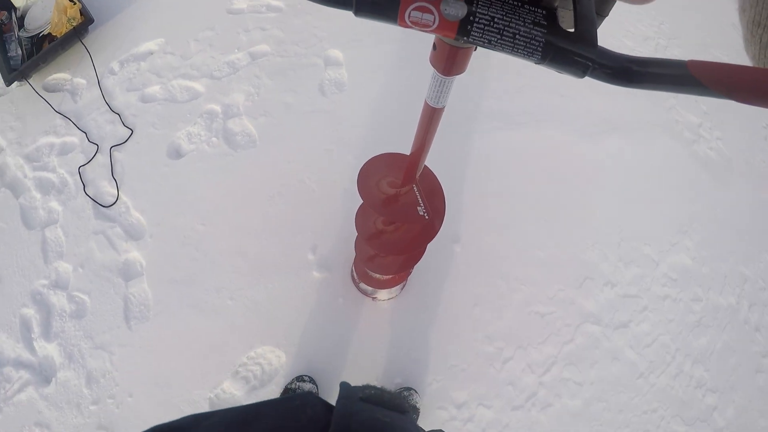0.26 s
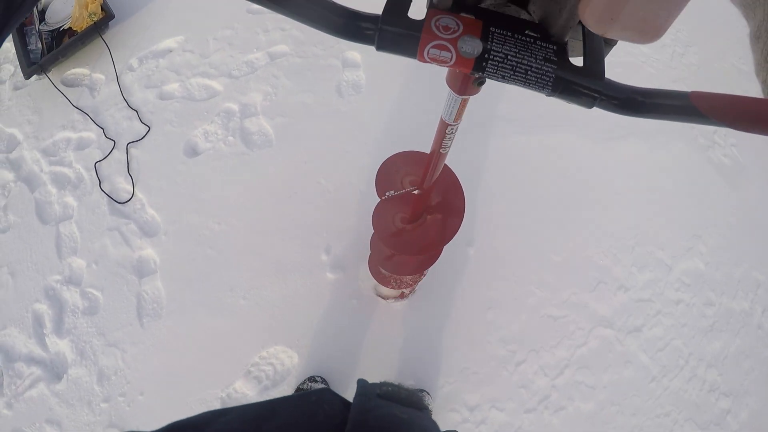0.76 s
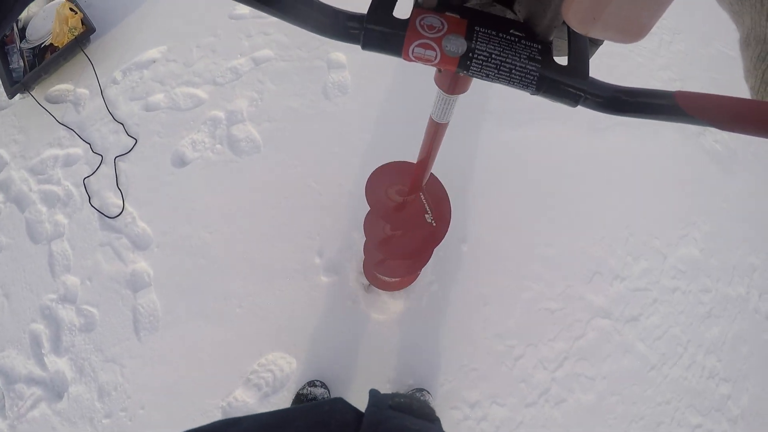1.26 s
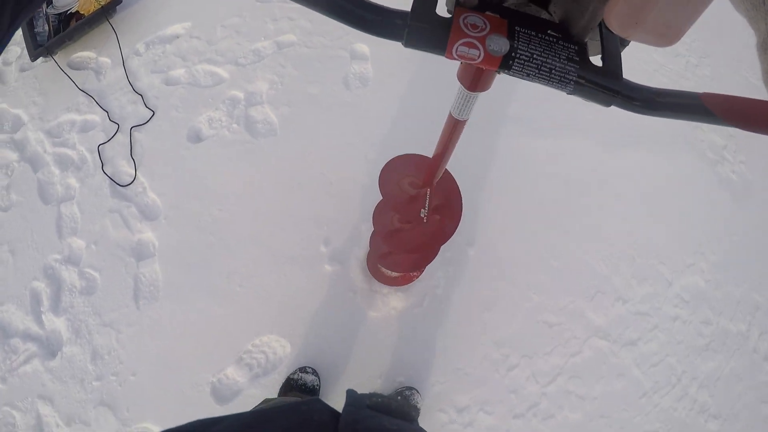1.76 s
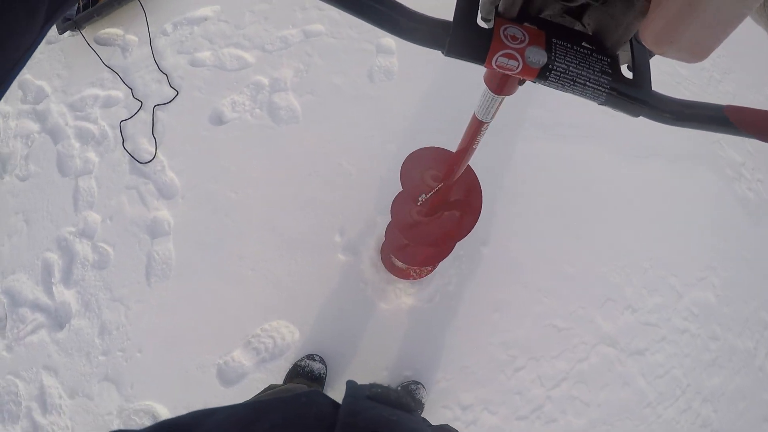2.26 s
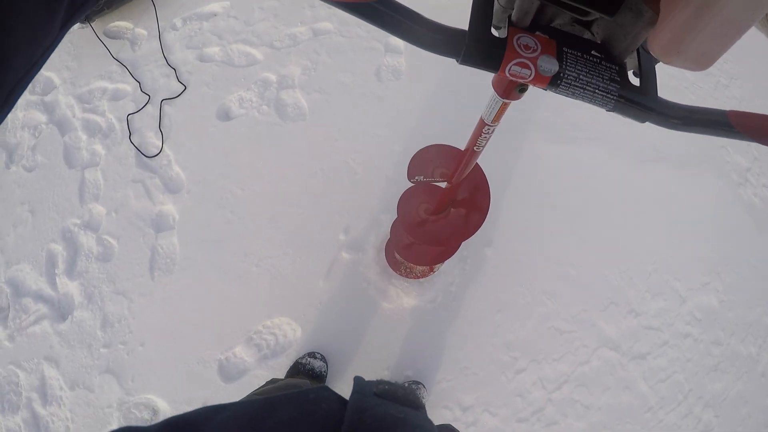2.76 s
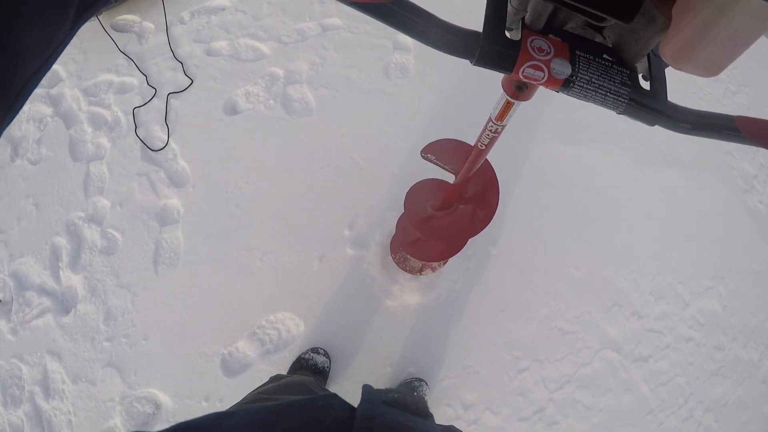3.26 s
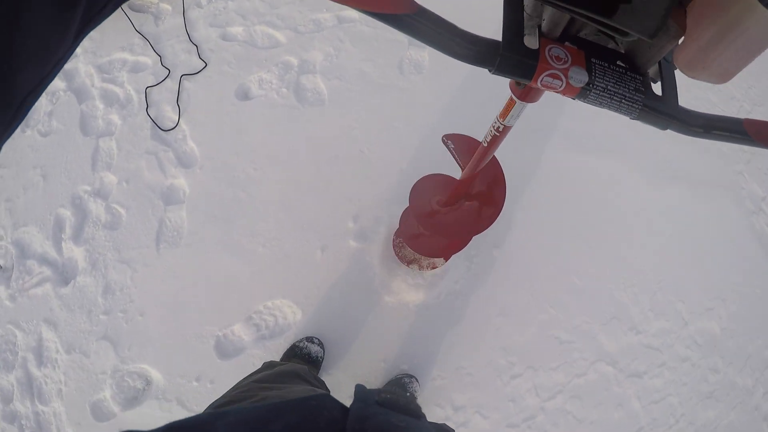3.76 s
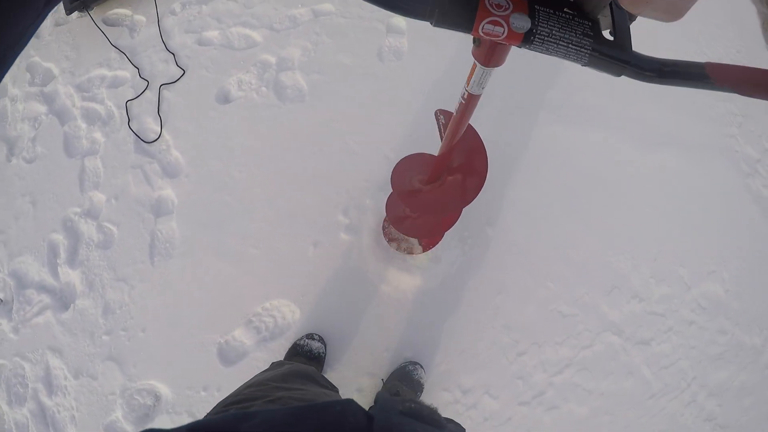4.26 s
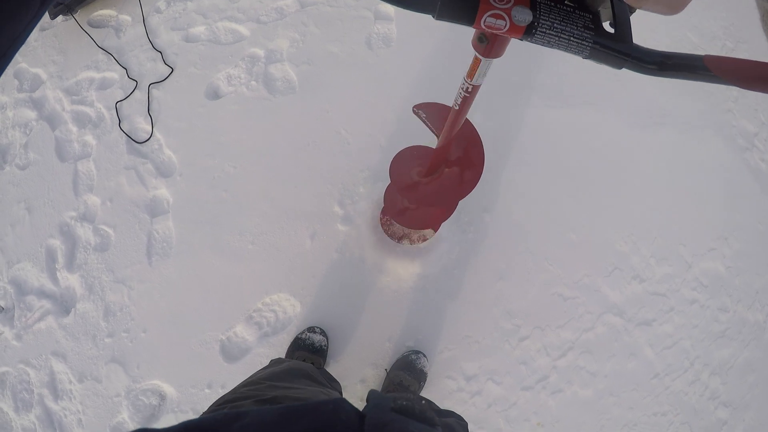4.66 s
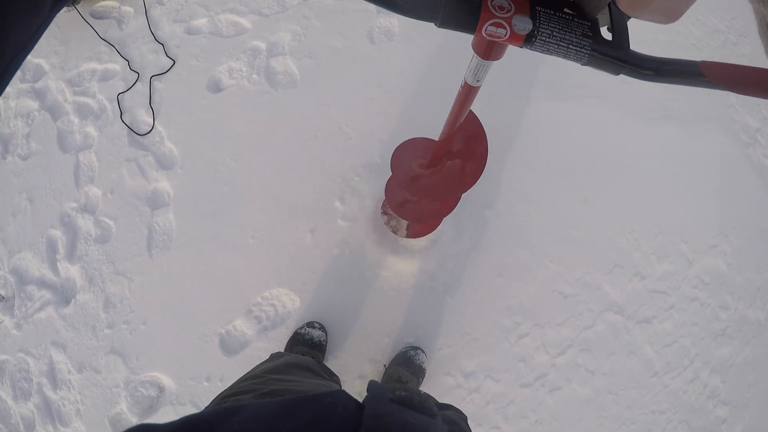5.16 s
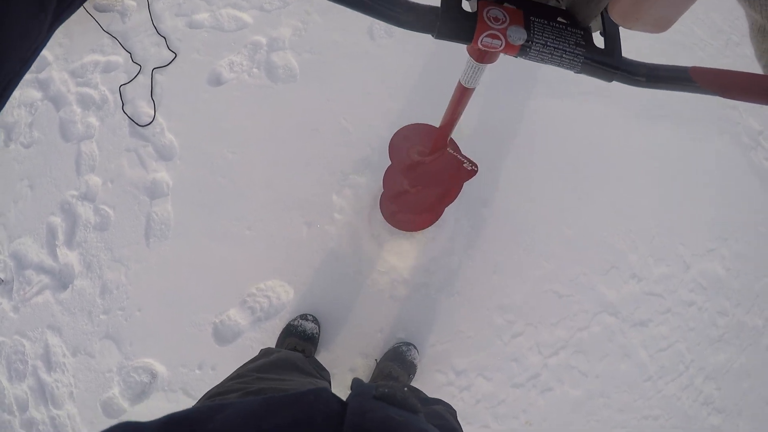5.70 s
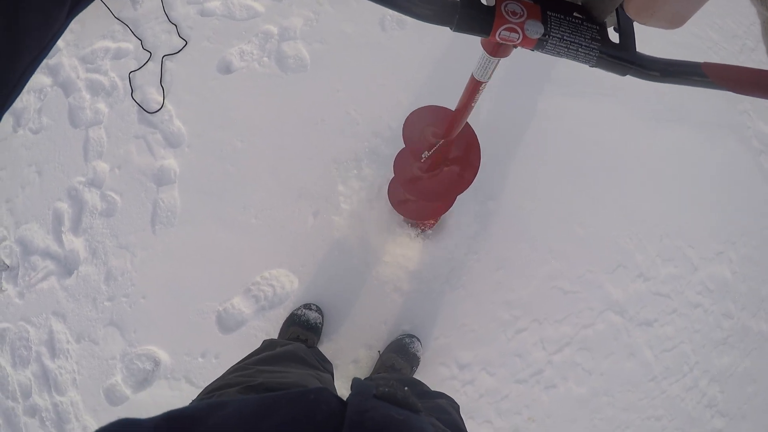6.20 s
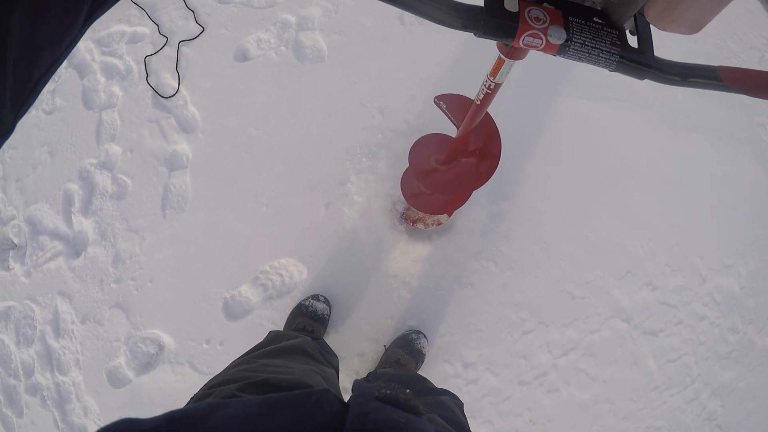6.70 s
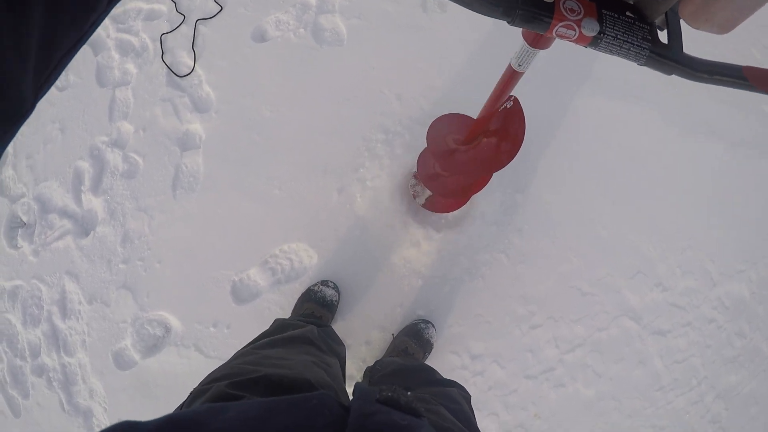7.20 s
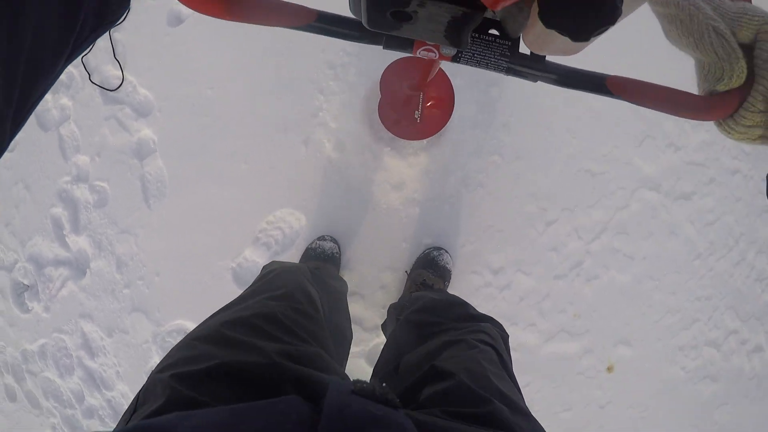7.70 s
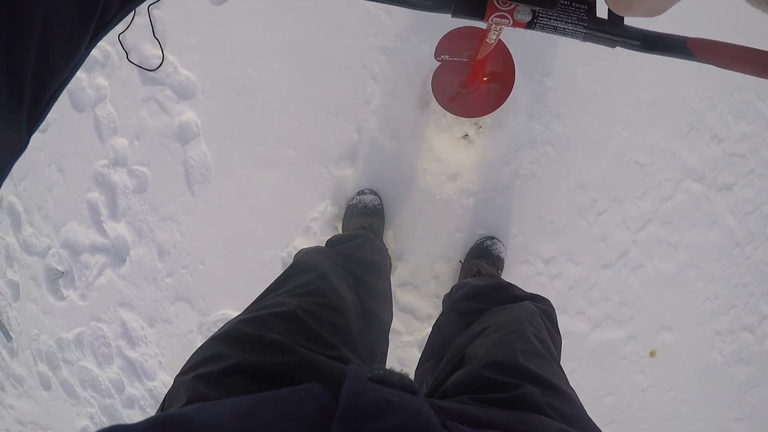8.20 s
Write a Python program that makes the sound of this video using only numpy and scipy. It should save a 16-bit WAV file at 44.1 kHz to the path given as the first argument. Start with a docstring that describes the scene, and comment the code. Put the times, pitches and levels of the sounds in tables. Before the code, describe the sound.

A motorised ice auger heard very close outdoors, with no echo. The two-stroke engine lugs in a low rough drone while blades scrape the ice with growing hiss. The scrape fades as they sink, the engine climbs and its gears sing. Near the end it races with a whistle, then slows and sputters unevenly. Body-worn microphone, opening up from mono to stereo.

```python
"""A two-stroke ice auger bores through lake ice, heard close up by a body-worn camera's microphones.
At first the engine labours, a deep exhaust thud under overtones, while the blades scrape the surface.
As they sink the scrape fades, the engine speeds up and its loaded gearbox sings; one microphone gives way to two.
Near the end the auger is lifted and the engine races, its flywheel vanes whistling. Then the throttle
closes: it slows and sputters, strong and weak firings mostly alternating, and its exhaust note dies away."""
import sys
import numpy as np
from scipy import signal
from scipy.fft import rfft, irfft, next_fast_len
from scipy.io import wavfile

SR = 44100
rng = np.random.default_rng(int(sys.argv[2]) if len(sys.argv) > 2 else 0)


def inscribe(sig):
    """Save sig as 16-bit PCM at rate SR to the path in sys.argv[1].

    A 1-D sig is mono; a 2-D sig holds one channel per row.
    Samples are clipped to [-1, 1] before scaling.
    """
    pcm = np.round(np.clip(np.atleast_2d(sig).T, -1, 1) * 32767)
    wavfile.write(sys.argv[1], SR, pcm.astype(np.int16))


N = 372644
TIME = np.arange(N) / SR

# the steps of the job: (start [s], length [s])
CATCH = (0.33, 0.12)  # the engine clears and fires more evenly
SINK = (1.57, 0.38)  # the blades sink below the surface
LIFT = (7.25, 0.025)  # the blades leave the ice
RELEASE = (7.48, 0.21)  # the throttle closes
COAST = (8.35, 0.09)  # the thud dies away


def amp(db):
    """Decibels to gain."""
    return 10 ** (np.asarray(db) / 20)


def unit(x):
    """Scales to rms 1."""
    return x / np.sqrt(np.mean(x ** 2) + 1e-20)


def blend(a, b, share):
    """From a at share 0 to b at share 1."""
    return a + (b - a) * share


def done(step):
    """How far a step of the job has gone: 0 before it, 1 after it."""
    start, length = step
    return np.clip((TIME - start) / length, 0, 1)


def curve(rows, column=1):
    """One column of a time table at every sample."""
    table = np.array(rows, float)
    return np.interp(TIME, table[:, 0], table[:, column])


def colour(rows, hz, column=1):
    """One column of a frequency (or engine order) table, read on a log axis."""
    table = np.array(rows, float)
    return np.interp(np.log(hz + 1), np.log(table[:, 0] + 1), table[:, column])


def drift(hz):
    """Random wander of rms 1 that takes hz new values a second."""
    knots = rng.standard_normal(4096)
    return unit(np.interp(TIME * hz, np.arange(len(knots)), knots))


def hiss(spectrum):
    """Coloured noise at two microphones, partly alike by frequency; their mean has rms 1."""
    # how alike the two microphones hear hiss: (frequency [Hz], coherence [0 to 1])
    likeness = [(100, 1), (600, 0.9), (1100, 1), (2500, 0.25), (4400, 0.99), (5500, 0.53), (7000, 0.64),
                (9000, 0.38), (14000, 0.38)]
    size = next_fast_len(N)
    hz = np.fft.rfftfreq(size, 1 / SR)
    shared, apart = rfft(rng.standard_normal((2, size))) * amp(colour(spectrum, hz))
    alike = np.clip(colour(likeness, hz), 0, 1)
    side = apart * np.sqrt((1 - alike) / (1 + alike))
    pair = irfft([shared + side, shared - side], size)[:, :N]
    return pair / pair.mean(0).std()


def ring(spectrum, size=4096):
    """Minimum-phase impulse response of energy 1, shaped by the given spectrum."""
    hz = abs(np.fft.fftfreq(size, 1 / SR))
    log_gain = np.log(amp(colour(spectrum, hz)))
    response = np.fft.ifft(np.exp(np.conj(signal.hilbert(log_gain)))).real
    return response / np.linalg.norm(response)


def load_stage(speed):
    """0 bogged, 1 lugging, 2 cutting, 3 easing: set by speed under throttle; 4 once the engine runs free."""
    # speed at which each timbre holds: bogged, lugging, cutting, easing [turns per second]
    stage_speeds = [79.8, 85.5, 100.2, 118.3]
    loaded = np.interp(speed, np.sort(stage_speeds), np.arange(len(stage_speeds)))
    return blend(loaded, len(stage_speeds), done(RELEASE))


def thud_level(boring_db=-12.0, lugging_db=2.0, settle_s=1.1, settle_length_s=1.4,
               bogged_db=-1.5, free_db=-3, coast_db=-12):
    """The fundamental (dB): strongest while the engine lugs, weaker with the throttle closed."""
    level = boring_db + lugging_db * (1 - done((settle_s, settle_length_s)))
    level = level + bogged_db * (1 - done(CATCH))
    return level + free_db * done(RELEASE) + coast_db * done(COAST)


def bark_level(surface_db=-13.5, boring_db=-15.5, bogged_db=-0.75, free_db=-3.5):
    """The overtones together (dB), lower as the blades sink and again as the throttle closes."""
    level = blend(surface_db, boring_db, done(SINK))
    return level + bogged_db * (1 - done(CATCH)) + free_db * done(RELEASE)


def exhaust(turns, speed, lead=5.66, lead_per_stage=0.68, knee_hz=125, flutter=0.0089):
    """One firing a turn gives a deep thud and overtones whose balance and phase (radians) follow the load."""
    # exhaust timbre from heaviest load to none: (engine order, relative level [dB])
    bogged = [(1, 0), (2, -3), (3, -11), (4, -18), (5, -4.5), (6, -10.5), (7, -12.5), (8, -28), (9, -19),
              (10, -18.5), (11, -30.5), (12, -26)]
    lugging = [(1, 0), (2, -18), (3, -2), (4, -9), (5, -2), (6, -11.5), (7, -16.5), (8, -18.5), (9, -16),
               (10, -17.5), (11, -26.5), (12, -23)]
    cutting = [(1, 0), (2, -9.5), (3, -3.5), (4, -11.5), (5, -5), (6, -14), (7, -22.5), (8, -26),
               (9, -23.5), (10, -25), (11, -39), (12, -30.5)]
    easing = [(1, 0), (2, -3.5), (3, -5), (4, -11), (5, -5), (6, -15.5), (7, -21.5), (8, -24), (9, -25),
              (10, -27), (11, -41.5), (12, -35)]
    free = [(1, 0), (2, -3), (3, -8), (4, -13.5), (5, -4), (6, -9), (7, -17), (8, -23.5), (9, -21),
            (10, -25), (11, -37), (12, -34)]
    stage = load_stage(speed)
    orders = np.arange(1, 13)
    timbres = np.array([colour(rows, orders) for rows in (bogged, lugging, cutting, easing, free)])
    gains = [amp(np.interp(stage, np.arange(len(timbres)), levels)) for levels in timbres.T]
    # order 2 counts towards the bark only from cutting to easing and beyond
    power = sum(g ** 2 for g in gains[2:]) + gains[1] ** 2 * np.clip(stage - 2, 0, 1)
    bark = amp(bark_level()) / np.sqrt(power)
    out = np.zeros(N)
    for k, gain in enumerate(gains, 1):
        if k == 1:
            level = amp(thud_level())
        else:
            level = bark * gain * (1 + flutter * k * drift(14))
        # the muffler turns overtones against the thud
        shift = (lead - lead_per_stage * stage) / (1 + (knee_hz / (k * speed)) ** 2)
        out += np.sqrt(2) * level * np.cos(2 * np.pi * k * turns + shift)
    return out


def combustion(bogged_db=-32, clean_db=-46, free_db=-17.5, onset_s=0.03, loaded_chance=0.52, free_chance=0.92):
    """Swing between strong and weak firings (dB) and chance of alternating; both jump as the throttle closes."""
    free = done((RELEASE[0], onset_s))
    swing_db = blend(blend(bogged_db, clean_db, done(CATCH)), free_db, free)
    return swing_db, blend(loaded_chance, free_chance, free)


def sputter(turns, speed, scatter=0.8, bounce=0.44, bounce_s=0.00199):
    """Firings stronger or weaker than the mean ring the muffler; with the throttle closed most alternate."""
    # single uneven firings, each thumping in the muffler:
    # (time [s], size of the departure from the mean firing [dB])
    uneven_firings = [(.312, -16), (7.777, -12.5), (8.297, -14.5)]
    # the ring of one firing in the muffler: (frequency [Hz], relative level [dB])
    muffler_ring = [(30, -43.5), (65, -12.5), (120, -6.5), (170, -2.5), (225, 3), (280, -2.5), (340, -8),
                    (390, -3), (470, -9), (610, -8.5), (750, -20), (1100, -28), (2000, -55.5), (5000, -82)]
    at = np.flatnonzero(np.diff(np.floor(turns)) > 0)  # the sample of each firing
    flips, sizes = rng.random(len(at)), rng.uniform(-1, 1, len(at))
    swing_db, alternate = combustion()
    swing = np.cumprod(np.where(flips < alternate[at], -1, 1)) + scatter * sizes
    kicks = np.zeros(N)
    kicks[at] = unit(swing) * amp(swing_db[at])
    for s, db in uneven_firings:
        nearest = at[np.argmin(abs(TIME[at] - s))]
        kicks[nearest] = amp(db)
    # an all-pass: round trips in the chamber spread each pop
    trip = np.r_[1, np.zeros(round(bounce_s * SR)), bounce]
    muffler = signal.lfilter(trip[::-1], trip, ring(muffler_ring))
    return signal.oaconvolve(kicks * np.sqrt(SR / speed), muffler)[:N]


def gas(turns, speed, lugging_db=-35, running_db=-30, free_db=-29, pulsing=0.052):
    """Turbulent gas rushes from the exhaust, pulsing with each firing, louder as the load eases."""
    # the gas rush: (frequency [Hz], relative level per Hz [dB])
    gas_spectrum = [(20, -4.5), (60, -7), (110, -5.5), (280, 0.5), (380, -0.5), (520, 4.5), (620, 6),
                    (720, -2), (850, -10), (1300, -12.5), (2000, -33.5), (5000, -62.5)]
    by_stage = [lugging_db, lugging_db, running_db, running_db, free_db]
    level = np.interp(load_stage(speed), np.arange(5), by_stage)
    return hiss(gas_spectrum) * amp(level) * (1 + pulsing * np.cos(2 * np.pi * turns))


def casing(turns, speed, uneven_db=6.0, even_db=2, slack=0.0021, surface_db=-48, boring_db=-57.0,
           db_per_turn_rate=0.2, cruise_hz=102.8, free_db=4):
    """High engine orders buzz in piston and casing, swelling as they cross its resonances."""
    # the buzz: (frequency [Hz], relative level of an order there [dB])
    resonances = [(1000, 0), (1200, 3.5), (1450, -2), (1900, -1), (2120, -7), (2330, -2), (2600, -12.5),
                  (3100, -13), (4200, -14.5), (5200, -10), (7000, -32.5), (9000, -23)]
    angle = 2 * np.pi * (turns + slack * drift(60))
    coarse, out = slice(None, None, 256), np.zeros(N)
    for k in range(13, 64):
        wander = np.interp(TIME[coarse] * 2, np.arange(32), rng.standard_normal(32))
        db = colour(resonances, k * speed[coarse]) + uneven_db * wander
        db = db + even_db * (-1) ** k  # even orders stronger, odd ones weaker
        gain = np.interp(TIME, TIME[coarse], amp(db))
        out += gain * np.cos(k * angle + 2 * np.pi * rng.random())
    running_db = boring_db + db_per_turn_rate * (speed - cruise_hz) + free_db * done(RELEASE)
    return out * amp(blend(surface_db, running_db, done(SINK)))


def surge(centre_s=7.66, width_s=0.09):
    """One smooth swell of height 1 as the engine overruns."""
    return np.exp(-((TIME - centre_s) / width_s) ** 2)


def flywheel(turns, speed, shroud_hz=2340, width_hz=330, turbulence=0.0025, free_turbulence=0.006,
             flutter=0.35, surface_db=-45, boring_db=-53, free_db=-42, rise_s=0.2, surge_db=7):
    """Vane tones swell as the speed carries them through the shroud's resonance; jitter is in turns."""
    # vanes whistling in their shroud: (engine order, relative level [dB])
    vanes = [(16, -4), (17, -14.5), (18, -1), (20, 1), (21, -8.5), (26, -8), (27, -1.5)]
    out, jitter = np.zeros(N), blend(turbulence, free_turbulence, done(RELEASE))
    for k, db in vanes:
        k = round(k)
        resonance = 1 / np.hypot(1, 2 * (k * speed - shroud_hz) / width_hz)
        gain = amp(db) * resonance * (1 + flutter * drift(90))
        out += gain * np.cos(2 * np.pi * (k * (turns + jitter * drift(90)) + rng.random()))
    level = blend(surface_db, boring_db, done(SINK))
    level = blend(level, free_db, done((LIFT[0], rise_s)))
    return out * amp(level + surge_db * surge())


def fan(turns, surface_db=-41, boring_db=-37.5, lifted_db=-1.0, surge_db=4, coast_db=4, pulsing=0.088,
        flicker_db=1.0):
    """Cooling air and machinery hiss, throbbing lightly each turn; it dips at the lift and swells at the overrun."""
    # the hiss: (frequency [Hz], relative level per Hz [dB])
    air = [(400, -3.5), (1000, 5.5), (1600, 3.5), (2300, 1.5), (2600, -4), (3300, 2), (4200, -6),
           (5300, -1.5), (6100, -0.5), (7000, 1), (7900, -10.5), (10000, -17), (11200, -32.5),
           (15000, -41.5)]
    level = blend(surface_db, boring_db, done(SINK)) + lifted_db * done(LIFT)
    level = level + surge_db * surge() + coast_db * done(COAST)
    return hiss(air) * amp(level + flicker_db * drift(40)) * (1 + pulsing * np.cos(2 * np.pi * turns))


def blades(touch_db=-39.5, pressed_db=-30, press_s=1.35, sunk_db=-9, fade_db_per_s=16, grain_db=2.0):
    """The blades shave the surface ever harder, a grainy hiss, then fade as they sink into the hole."""
    # the scrape: (frequency [Hz], relative level per Hz [dB])
    shaving = [(700, -9), (1150, 4.5), (1400, 0.5), (1800, -1), (2300, -1), (3300, 0.5), (4000, 3),
               (5300, 7.5), (6200, 5.5), (7300, -0.5), (10000, -13.5), (11200, -31.5), (12400, -21.5),
               (14000, -30.5)]
    level = blend(touch_db, pressed_db, done((0, press_s))) + sunk_db * done(SINK)
    level = level - fade_db_per_s * np.maximum(TIME - SINK[0], 0)
    return hiss(shaving) * amp(level + grain_db * drift(300))


def gearbox(turns, speed, teeth=7, backlash=0.0024, chatter=0.36, throb=0.27, bite_db=1.5,
            surface_db=-58, loaded_db=-47):
    """The pinion's teeth sing under load, swelling as the blades bite; backlash (turns) roughens the lines."""
    # tooth tones: (multiple of the tooth rate, relative level [dB])
    mesh = [(2, -6), (3, -7), (4, -1.5), (5, -6.5), (6, -6), (7, -2), (8, -4), (9, -10), (10, -8.5)]
    # resonances of the gear housing: (frequency [Hz], relative level [dB])
    housing = [(1400, -8), (1640, 2.5), (2000, -0.5), (2300, -2.5), (2550, -10), (2750, -1), (2950, -5.5),
               (3300, -1), (3650, 3), (4100, -13.5), (5000, -3), (5350, 0), (5850, -2), (8000, -10.5)]
    angle = 2 * np.pi * teeth * (turns + backlash * drift(90))
    bite, out = drift(9), np.zeros(N)
    for k, db in mesh:
        k = round(k)
        swell = bite_db * (bite + drift(7)) / np.sqrt(2)  # partly common to all tones
        gain = amp(db + swell + colour(housing, k * teeth * speed)) * (1 + chatter * drift(35))
        out += gain * np.cos(k * angle + 2 * np.pi * rng.random())
    torque = amp(blend(surface_db, loaded_db, done(SINK))) * (1 - done(LIFT))
    return np.sqrt(2) * out * torque * (1 + throb * np.cos(2 * np.pi * turns))


def scene(wobble_hz=0.2):
    """One crankshaft drives the engine and gearbox, close by in the open; no echo is added."""
    # crankshaft speed, one firing a turn: (time [s], speed [turns per second])
    crankshaft = [(0.0, 81.7), (0.34, 83), (0.44, 85.5), (1.03, 86.6), (1.28, 97.8), (1.63, 103.4),
                  (1.86, 104.6), (2.16, 102.4), (2.72, 104.7), (2.88, 103), (3.59, 103.8), (3.82, 97),
                  (4.29, 105.7), (4.8, 110.2), (4.93, 108.6), (5.14, 113.5), (5.62, 117), (5.94, 116.8),
                  (6.22, 121), (6.62, 120.6), (6.84, 116.6), (7.22, 118.5), (7.49, 135), (7.61, 134),
                  (7.79, 119), (8.0, 112), (8.36, 106), (8.45, 95)]
    speed = curve(crankshaft) + wobble_hz * drift(12)
    turns = np.cumsum(speed) / SR
    engine = exhaust(turns, speed) + sputter(turns, speed) + casing(turns, speed) + flywheel(turns, speed)
    return engine + gas(turns, speed) + fan(turns) + blades() + gearbox(turns, speed)


def record(dry, pair_s=1.593, fade_s=0.081, edge_hz=15250):
    """One bright microphone fades to two ports that differ in level and phase; then a low-pass."""
    # the single microphone against the pair: (frequency [Hz], level [dB])
    single_tone = [(700, 0), (1000, 4.5), (1210, 5.5), (1480, 6.5), (1850, -7), (2300, 4.5), (3300, 4.5),
                   (4600, 1.5), (6200, -2.5), (7400, -5.5), (11000, -2.5), (12400, 8), (15000, 11)]
    # the two ports: (frequency [Hz], left minus right [dB], phase by which left leads [radians])
    port_contrast = [(60, 1.8, -.04), (200, 2, -.2), (320, .8, -.42), (430, -1.3, -.7), (540, -4.8, -1.03),
                     (670, -9, -1.45), (820, -15, -2.8), (1020, -14, -3.95), (1300, -6, -5.05),
                     (1700, 4, -6), (2300, 0, -7.2), (3300, -3, -6.95), (4400, 0, -6.3), (5200, 4, -6.7),
                     (6900, 6.5, -6.65), (13000, 5, -6.7)]
    size = next_fast_len(N + 4096)
    hz, spectra = np.fft.rfftfreq(size, 1 / SR), rfft(dry, size)
    single = irfft(spectra.mean(0) * amp(colour(single_tone, hz)), size)[:N]
    ratio = amp(colour(port_contrast, hz)) * np.exp(1j * colour(port_contrast, hz, column=2))
    ports = 2 * np.array([ratio, np.ones_like(ratio)]) / (1 + ratio)  # the mean of the two stays 1
    pair = irfft(spectra * ports, size)[:, :N]
    single_share = np.exp(-np.maximum(TIME - pair_s, 0) / fade_s)
    heard = blend(pair, single, single_share)
    low_pass = signal.firwin(511, edge_hz, window=("kaiser", 9), fs=SR)
    return signal.oaconvolve(heard, low_pass[None], "same")


dry = scene()
out = record(dry)
inscribe(out)
```